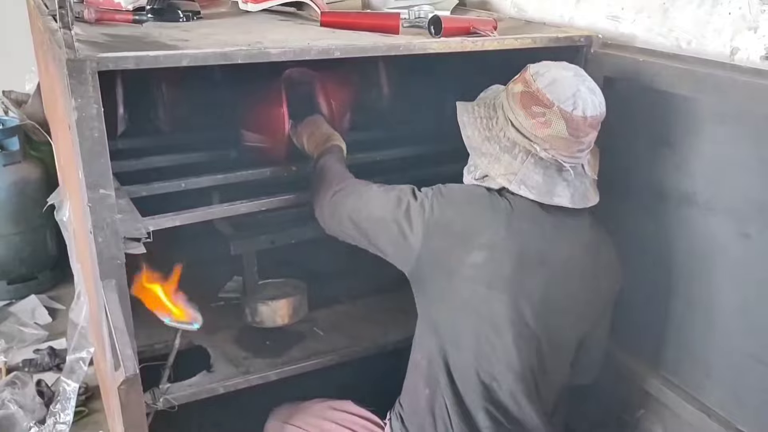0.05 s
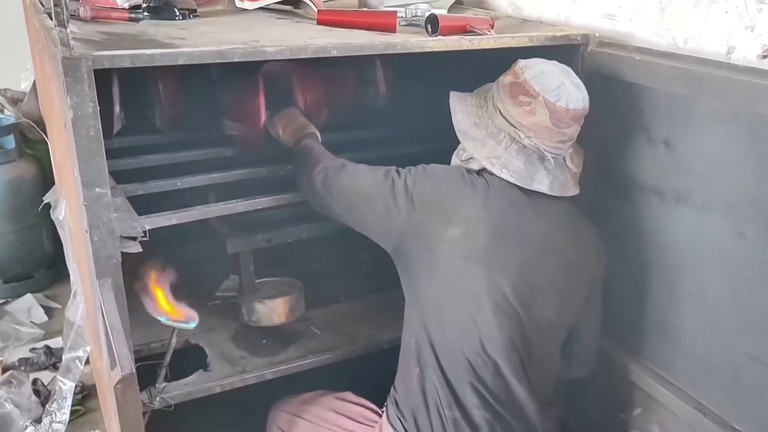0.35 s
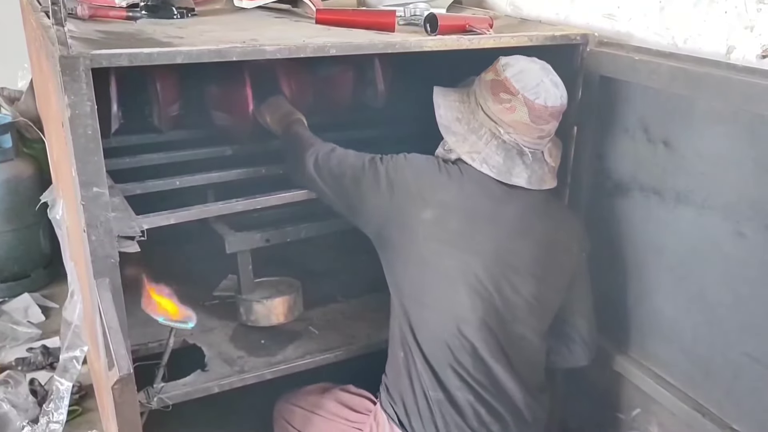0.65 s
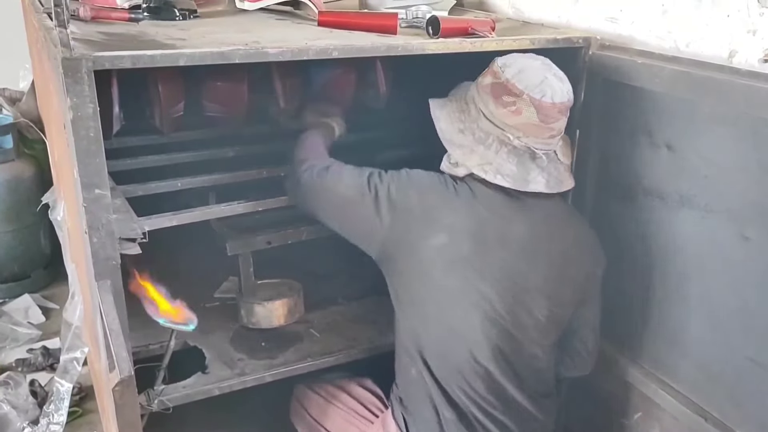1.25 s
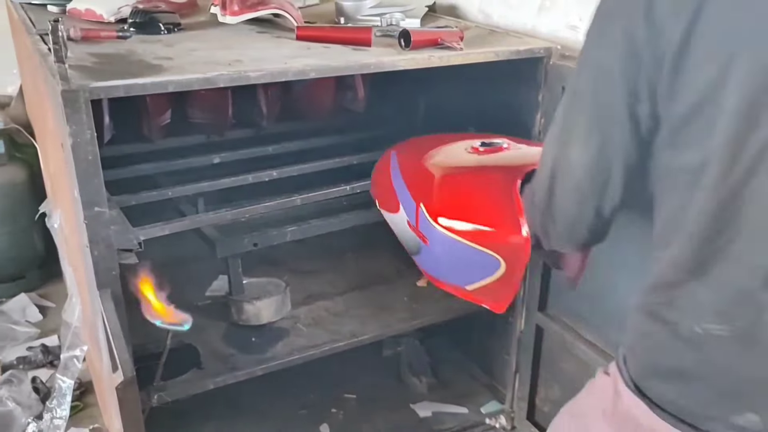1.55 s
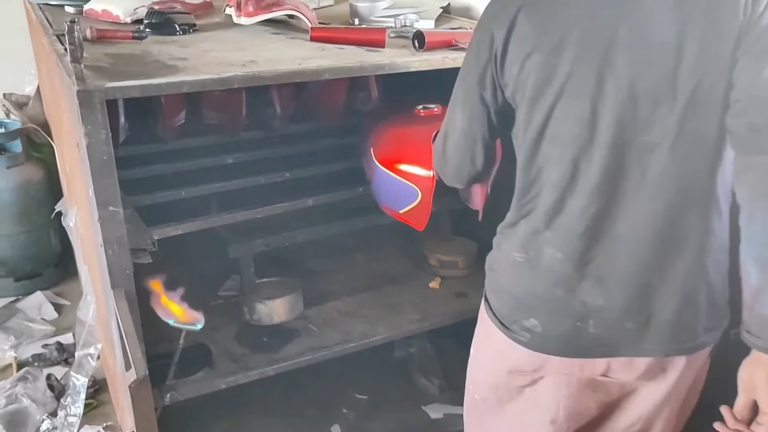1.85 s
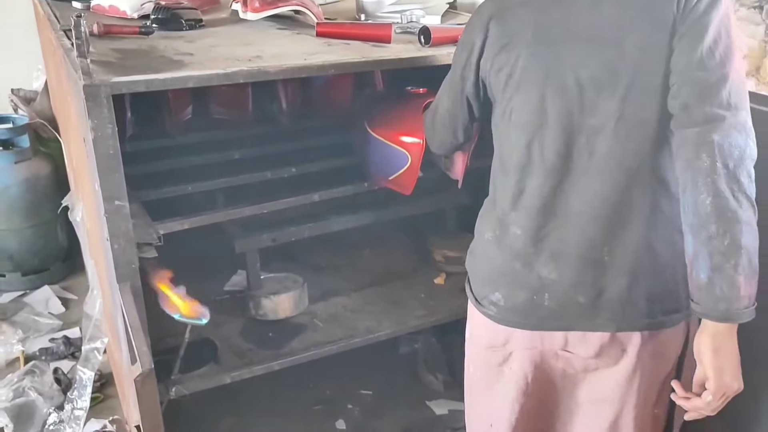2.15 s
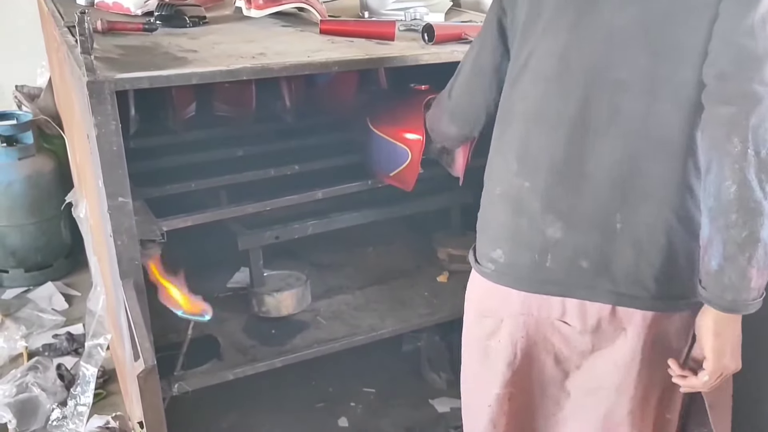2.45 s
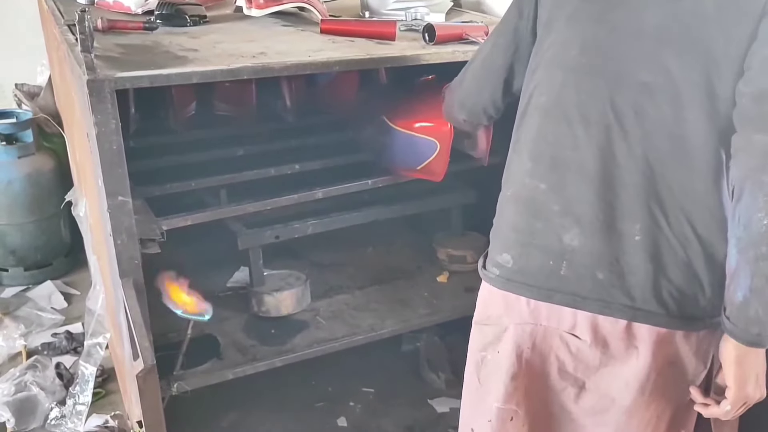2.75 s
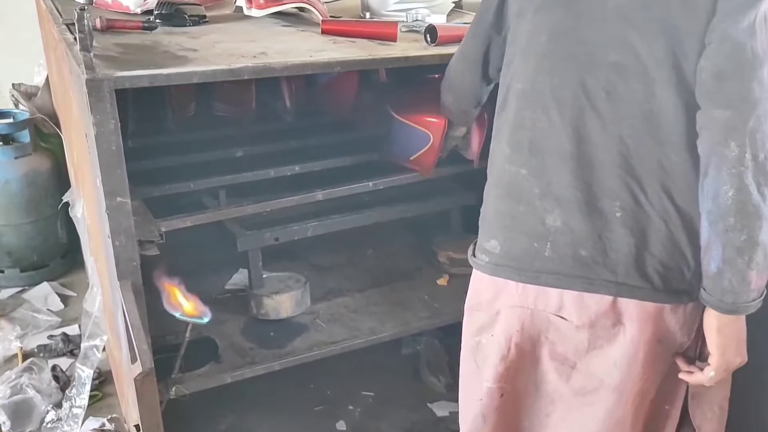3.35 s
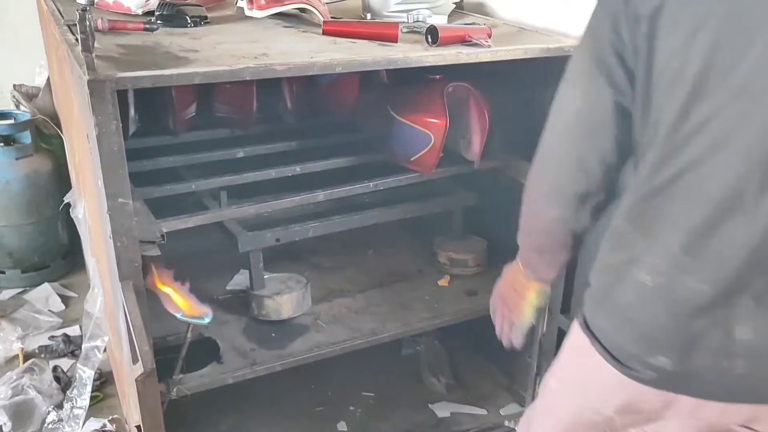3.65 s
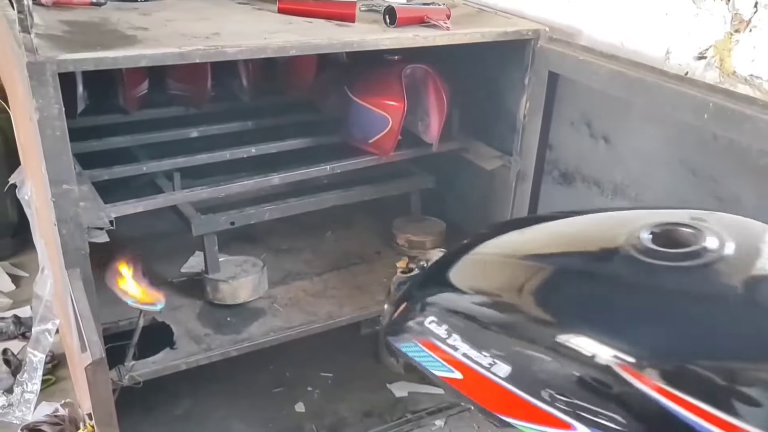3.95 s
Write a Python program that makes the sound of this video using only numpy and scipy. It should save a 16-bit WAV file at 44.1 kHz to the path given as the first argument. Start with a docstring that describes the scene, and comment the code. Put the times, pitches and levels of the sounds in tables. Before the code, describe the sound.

A steel tank scrapes and knocks on a metal rack over a gas flame's rumble.

```python
"""A steel fuel tank scrapes along rack bars over the rumble and hiss of a gas flame.
Tanks are slid and knocked onto the rack inside a sheet-metal drying cabinet: small slips and hard
contacts ring tank and cabinet, steel squeaks on steel, and a glove rubs lightly.
A slow one-cylinder engine seems to thud outside the workshop, each firing a run of pipe tones and echoes.
A few soft bumps reach the hand-held microphone."""
import sys
import numpy as np
from scipy import signal
from scipy.fft import rfft, irfft
from scipy.io import wavfile
from scipy.ndimage import uniform_filter1d

SR = 44100
rng = np.random.default_rng(int(sys.argv[2]) if len(sys.argv) > 2 else 0)


def wrap_up_sound(samples):
    """Save the sound to the file named by the first command line argument, as 16-bit audio."""
    columns = np.atleast_2d(samples).T
    # keep every value between -1 and 1, then stretch to whole-number steps
    tamed = np.clip(columns, -1, 1)
    steps = np.round(tamed * 32767).astype(np.int16)
    wavfile.write(sys.argv[1], SR, steps)


N = 176400


def amp(db):
    """Decibels to gain."""
    return 10 ** (np.asarray(db) / 20)


def unit(x):
    """Scale to unit rms."""
    return x / np.sqrt(np.mean(x ** 2) + 1e-20)


def at_hz(table, hz, column=1):
    """Table column interpolated over log frequency."""
    rows = np.array(table)
    return np.interp(np.log(hz + 1), np.log(rows[:, 0] + 1), rows[:, column])


def at_time(table, t):
    """Control curve interpolated at times t."""
    return np.interp(t, *np.transpose(table))


def pan(db):
    """Stereo gains for a left-minus-right level."""
    return amp(np.array([[db], [-db]]) / 2)


def add(mix, start_s, sound):
    """Mix a sound in, cropped to the mix."""
    start = round(start_s * SR)
    sound = sound[:, max(-start, 0):]
    part = mix[:, max(start, 0):][:, :sound.shape[1]]
    part += sound[:, :part.shape[1]]


def stereo_spectra(coherence, hz, shape):
    """Partly coherent left and right noise spectra."""
    left, other = rng.standard_normal((2, *shape)) + 1j * rng.standard_normal((2, *shape))
    shared = np.clip(at_hz(coherence, hz), -1, 1)
    return np.array([left, shared * left + np.sqrt(1 - shared ** 2) * other])


# flame and room spectrum (frequency [Hz], relative density [dB])
FLAME_SPECTRUM = [(25, -19), (60, -6.5), (110, -2.5), (190, 0.5), (300, -4.5), (390, -6.5), (600, -3),
                  (850, -17), (1300, -22.5), (2000, -26), (3300, -29), (4400, -28), (5200, -32),
                  (7000, -32), (14000, -29.5)]
# flame balance (frequency [Hz], left minus right [dB])
FLAME_BALANCE = [(60, -2.5), (200, -1.5), (400, -1), (800, 0.5), (2000, -3.5), (4200, 1.5), (7000, 1),
                 (14000, -6.5)]
# flame left-right likeness (frequency [Hz], coherence [0..1])
FLAME_COHERENCE = [(50, .3), (150, .72), (400, .62), (1000, .4), (3000, .15), (9000, 0)]
# rumble band (time [s], gain [dB])
RUMBLE_GAIN = [(0, -4), (.3, 2), (1.6, -2), (2.0, 3.5), (2.55, -2.5), (2.8, 2), (3.15, -0.5), (3.55, 7),
               (3.85, 9), (4, 0.5)]
# hiss band (time [s], gain [dB])
HISS_GAIN = [(0, 3), (.7, 3.5), (1.55, 3.5), (2.0, 1), (2.35, 2.5), (3.0, 1), (3.3, 3.5), (4, 2.5)]
# narrow sizzle band (time [s], gain [dB])
SIZZLE_GAIN = [(0, 6), (.12, 3), (.25, -3.5), (1.68, -2), (1.71, 10), (1.85, 6.5), (2.1, -0.5), (2.45, 7.5),
               (2.6, 4.5), (2.9, -2.5), (3.22, 9), (3.5, -3.5), (3.75, 1), (3.95, 7.5)]
# broad top band (time [s], gain [dB])
TOP_GAIN = [(0, 1), (.7, 3), (1.62, 1.5), (1.75, -1), (2.3, 0.5), (4, -0.5)]

def flame(rms_db=-29.5, flutter_db=.5, patch_db=1.3, size=1024):
    """Gas flame: a fluttering rumble under a thin hiss."""
    hop = size // 4
    t = np.arange(N // hop + 5)[:, None] * hop / SR
    hz = np.fft.rfftfreq(size, 1 / SR)
    shape = (len(t), len(hz))
    patches = uniform_filter1d(rng.standard_normal(shape), size=9, axis=0)
    patches = unit(uniform_filter1d(patches, size=14, axis=1))
    flutter = unit(uniform_filter1d(rng.standard_normal(t.shape), size=8, axis=0))
    rumble_band = 1 / (1 + (hz / 226) ** 4)
    hiss_band = hz ** 2 / (hz ** 2 + 1000 ** 2)
    sizzle_band = np.exp(-((hz - 9340) / 910) ** 2)
    top_band = np.exp(-((hz - 11200) / 3700) ** 2)
    db = at_hz(FLAME_SPECTRUM, hz) + patch_db * patches * (1 - hiss_band / 2)
    db += rumble_band * (at_time(RUMBLE_GAIN, t) + flutter_db * flutter)
    db += hiss_band * at_time(HISS_GAIN, t)
    db += sizzle_band * at_time(SIZZLE_GAIN, t)
    db += top_band * at_time(TOP_GAIN, t)
    side_db = at_hz(FLAME_BALANCE, hz) / 2
    spectra = stereo_spectra(FLAME_COHERENCE, hz, shape) * amp([db + side_db, db - side_db])
    _, noise = signal.istft(spectra.transpose(0, 2, 1), nperseg=size, noverlap=size - hop)
    return amp(rms_db) * unit(noise[:, :N])


# pipe tones and echoes of one firing
# (delay [s], frequency [Hz], Gaussian sigma [s], relative level [dB], left minus right [dB])
PIPE_TONES = [(.007, 490, .0098, -23.1, 0), (.016, 225, .0055, -28, -5), (.019, 585, .0042, -31.5, 3),
              (.038, 223, .0098, -23.4, -6), (.043, 578, .0055, -30, 0), (.059, 221, .008, -30.5, -4)]
FIRING_HZ, FIRING_JITTER_S, FIRING_SPREAD_DB = 12.546, 0.00069, 0.5
ECHO_JITTER_S, ECHO_SPREAD_DB = 0.000087, 1.56

def engine(gain_db=.5, left_lead_rad=.25, pitch_spread=.011):
    """One cylinder: each firing sends the same run of pipe tones and echoes, slightly early or late."""
    out, t = np.zeros((2, N)), np.arange(-SR // 20, SR // 20) / SR
    lead_rad = np.array([[left_lead_rad], [0]])
    for firing in range(-1, int(N / SR * FIRING_HZ) + 2):
        late, force = rng.standard_normal(2)
        firing_s = firing / FIRING_HZ + FIRING_JITTER_S * late
        for delay_s, hz, sigma_s, db, side_db in PIPE_TONES:
            louder, later, higher = rng.standard_normal(3)
            phase = 2 * np.pi * hz * (t * (1 + pitch_spread * higher) + delay_s) + lead_rad
            tone = np.exp(-(t / sigma_s) ** 2 / 2) * np.cos(phase)
            gain = amp(gain_db + db + FIRING_SPREAD_DB * force + ECHO_SPREAD_DB * louder)
            add(out, firing_s + delay_s + t[0] + ECHO_JITTER_S * later, gain * pan(side_db) * tone)
    return out


# bumps on the microphone (time [s], frequency [Hz], relative level [dB])
MIC_BUMPS = [(0.6257, 160, -16.5), (1.797, 133, -26), (1.807, 120, -22.5), (1.821, 186, -13),
             (1.839, 196, -14), (1.849, 168, -17), (1.858, 237, -17)]

def mic_bumps(pan_db=-14, half_width_cycles=.65):
    """Dull single pressure swings, mostly at the right port."""
    out, t = np.zeros((2, N)), np.arange(-SR // 20, SR // 20) / SR
    for time_s, hz, db in MIC_BUMPS:
        swing = -np.sin(2 * np.pi * hz * t) * np.exp(-(hz * t / half_width_cycles) ** 2)
        add(out, time_s + t[0], amp(db) * pan(pan_db) * swing)
    return out


# glove rubs (time [s], Gaussian sigma [s], centre [Hz], band sigma [octaves], level [dB])
GLOVE_RUBS = [(0.738, 0.011, 2630, 0.28, -30.5), (1.04, 0.017, 4100, .5, -43),
              (1.294, 0.01, 2280, 0.54, -37), (2.104, 0.015, 2300, 0.25, -43.5),
              (2.335, 0.017, 2930, .7, -41), (2.495, 0.025, 1310, .2, -40.5),
              (2.83, 0.029, 2060, 0.22, -45)]

def glove_rubs(grain_depth=.4, size=8192):
    """Glove on tank: short bursts of grainy noise, each in its own band."""
    out, t = np.zeros((2, N)), np.arange(-size // 2, size // 2) / SR
    hz = np.fft.rfftfreq(size, 1 / SR)
    for time_s, sigma_s, centre_hz, sigma_oct, db in GLOVE_RUBS:
        noise = rng.standard_normal((2, size))
        grain = np.exp(grain_depth * unit(uniform_filter1d(rng.standard_normal(size), size=80)))
        band = np.exp(-(np.log2((hz + 1) / centre_hz) / sigma_oct) ** 2 / 2)
        rub = unit(irfft(rfft(noise * grain) * band))
        add(out, time_s + t[0], amp(db) * rub * np.exp(-(t / sigma_s) ** 2 / 2))
    return out


# steel-on-steel squeaks (time [s], frequency [Hz], 1/e half width [s], level [dB])
STEEL_SQUEAKS = [(0.789, 5650, 0.0088, -38), (0.882, 5330, 0.012, -39), (0.955, 6400, .009, -41),
                 (1.214, 3960, 0.012, -35.5), (1.246, 4100, 0.034, -40)]

def squeaks(linewidth_hz=50):
    """Steel catches and sings on one unsteady note."""
    out, t = np.zeros((2, N)), np.arange(-SR // 20, SR // 20) / SR
    for time_s, hz, half_s, db in STEEL_SQUEAKS:
        drift_rad = np.cumsum(rng.standard_normal((2, len(t))), 1) * np.sqrt(2 * np.pi * linewidth_hz / SR)
        tone = np.sin(2 * np.pi * hz * t + drift_rad)
        add(out, time_s + t[0], amp(db) * np.exp(-(t / half_s) ** 2) * tone)
    return out


def rattle(t, spread_db=1.8, step_s=.002):
    """Uneven gain surges as the ring slaps between cabinet walls and loose bars."""
    knots_s = np.arange(0, t[-1] + step_s, step_s)
    return unit(amp(spread_db * np.interp(t, knots_s, rng.standard_normal(len(knots_s)))))


# dense ring of tank and cabinet (frequency [Hz], relative density [dB], t60 [s], rise [s])
SHELL_BANDS = [(30, -14, 0.67, .02), (71, -13, 0.98, 0.023), (153, -5, 1, 0.023), (284, -4, 0.74, 0.028),
               (395, -0.5, 0.77, 0.0089), (787, 0, .48, 0.008), (1340, -5, 0.43, 0.0013),
               (1790, -8, 0.33, 0.0012), (2130, -4, 0.27, 0.00082), (2690, -16, 0.39, 0.0011),
               (3600, -20.5, .28, .002), (4460, -16.5, 0.29, 0.0018), (4800, -24, 0.27, 0.0043),
               (6800, -23, 0.18, 0.0022), (14000, -21.5, 0.17, 0.0033)]
# clearest tank modes (frequency [Hz], relative level [dB], t60 [s])
TANK_MODES = [(382, -7, .38), (425, -7, .5), (576, -3, .3), (705, -2, .36), (780, -6, .3), (1030, -4, .36),
              (1190, -3, .38), (1287, -6, .36), (1484, -7, .28), (1848, -11, .33), (2079, -10, .36),
              (2223, -9, .38), (2439, -10, .38), (2530, -15, .38)]
# tank left-right likeness (frequency [Hz], coherence [0..1])
TANK_COHERENCE = [(60, .45), (150, .85), (380, .86), (950, .48), (2400, .12), (6000, 0)]
TICK_DB, TICK_DECAY_S = -9, 0.00098
MODE_GAIN_DB, MODE_SPREAD_DB = -7.5, 2

def tank_ring(treble_db, bass_db, modes_db=0, size=32768):
    """One contact: a tick, the tank's modes, and a dense ring whose bass swells later and lasts longer."""
    t, hz = np.arange(size) / SR, np.fft.rfftfreq(size, 1 / SR)

    def tilt(f):
        return amp(treble_db * f ** 2 / (f ** 2 + 3000 ** 2) + bass_db / (1 + (f / 500) ** 2))

    def envelope(rise_s, t60_s):
        return (1 - np.exp(-t / rise_s)) * np.exp(-np.log(1000) * t / t60_s)

    colour = unit(amp(at_hz(SHELL_BANDS, hz))) * tilt(hz)
    spectra = stereo_spectra(TANK_COHERENCE, hz, hz.shape) * colour * np.sqrt(size / 2)
    tick = unit(np.diff(irfft(spectra), prepend=0)) * np.exp(-t / TICK_DECAY_S)
    out = amp(TICK_DB) * tick
    log_centres = np.log([row[0] + 1 for row in SHELL_BANDS])
    for selector, (_, _, t60_s, rise_s) in zip(np.eye(len(SHELL_BANDS)), SHELL_BANDS):
        triangle_band = np.interp(np.log(hz + 1), log_centres, selector)
        out += irfft(spectra * triangle_band) * envelope(rise_s, t60_s)
    out *= rattle(t)
    for mode_hz, db, t60_s in TANK_MODES:
        louder, turns, skew = rng.standard_normal(3)
        right_shift_rad = skew * np.pi * (1 - at_hz(TANK_COHERENCE, mode_hz))
        phase = 2 * np.pi * (mode_hz * t + turns) + np.array([[0], [right_shift_rad]])
        rise_s = at_hz(SHELL_BANDS, mode_hz, column=3)
        gain = amp(MODE_GAIN_DB + modes_db + db + MODE_SPREAD_DB * louder) * tilt(mode_hz)
        out += gain * envelope(rise_s, t60_s) * np.sin(phase)
    return out


# tank sliding on the bars (time [s], level [dB])
SLIDE_LEVEL = [(0, -30), (0.08, -30), (0.25, -34), (0.68, -58), (0.78, -54), (0.92, -32), (1.05, -35),
               (1.17, -32.5), (1.23, -24.5), (1.31, -25.5), (1.40, -14.5), (1.46, -29), (1.58, -58),
               (2.38, -58), (2.49, -32), (2.58, -139)]

def sliding(slips_per_s=260, spread_db=1):
    """Small uneven slips shake the tank as it is pushed along; the hand damps its modes."""
    slips = (rng.random(N) < slips_per_s / SR) * rng.choice([-1, 1], N)
    slips = slips * amp(spread_db * np.minimum(rng.exponential(1, N), 3))
    drive = unit(slips) * amp(at_time(SLIDE_LEVEL, np.arange(N) / SR))
    body = tank_ring(treble_db=-17.5, bass_db=7, modes_db=-8)
    return signal.fftconvolve(drive[None], body / np.linalg.norm(body[0]), axes=1)[:, :N]


# tank against rack (time [s], gain [dB], treble shelf [dB], bass shelf [dB])
RACK_KNOCKS = [(0.730, -25, 4.5, 8.5), (0.753, -20, -0.5, 9.5), (0.790, -28, 7.5, 7),
               (0.828, -28.5, -43, 16.5), (1.280, -25, -8.5, 6), (1.391, -18.5, -3.5, 2),
               (1.403, -15, -11, -2), (1.435, -25.5, -6, -20), (2.6126, -15.5, 6, 8), (2.630, -34, -13, 25),
               (3.322, -19, -5, 10.5), (3.336, -17.5, -2, 8), (3.464, -36, -8, 18),
               (3.597, -18.5, 8.5, 12.5), (3.617, -16.5, -16, 6.5), (3.660, -28.5, -25, 20.5),
               (3.820, -49, -2, 4)]

def knocks(graze_db=-8.5, max_lead_s=.008):
    """The tank grazes a bar just ahead of each strike, then rings."""
    out = np.zeros((2, N))
    graze = tank_ring(treble_db=0, bass_db=-5)
    for time_s, db, treble_db, bass_db in RACK_KNOCKS:
        add(out, time_s - max_lead_s * rng.uniform(0.44, 1), amp(db + graze_db) * graze)
        add(out, time_s, amp(db) * tank_ring(treble_db, bass_db))
    return out


def scene():
    """Tank slightly right, with engine, flame and microphone bumps."""
    tank = knocks() + sliding() + squeaks() + glove_rubs()
    return tank * pan(db=-1) + engine() + flame() + mic_bumps()


# microphone port response (frequency [Hz], left gain [dB], right gain [dB])
PORT_RESPONSE = [(2780, -1, 0), (7030, 1, -1), (7720, -10.5, -7), (8770, -38, 2), (8480, -29, 8),
                 (9580, -4.5, 7.5), (10600, -7, -2), (11700, -6, 1.5), (13200, -2.5, -5), (14200, -4, -6)]
DIP_AT_S, DIP_HALF_S, DIP_DB = 1.691, .005, -16
CUTOFF_HZ = 14400

def record(dry):
    """Each port colours the treble, the level dips once, and a low-pass limits the band."""
    hz, t = np.fft.rfftfreq(2 * N, 1 / SR), np.arange(N) / SR
    port_gains = amp([at_hz(PORT_RESPONSE, hz, column) for column in (1, 2)])
    coloured = irfft(rfft(dry, 2 * N) * port_gains)[:, :N]
    dip = amp(DIP_DB * np.exp(-((t - DIP_AT_S) / DIP_HALF_S) ** 4))
    lowpass = signal.firwin(401, CUTOFF_HZ, window=("kaiser", 9), fs=SR)
    return signal.oaconvolve(coloured * dip, lowpass[None], "same")


dry = scene()
out = record(dry)
wrap_up_sound(out)
```